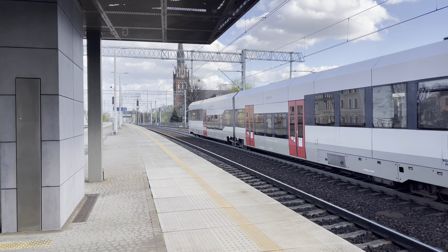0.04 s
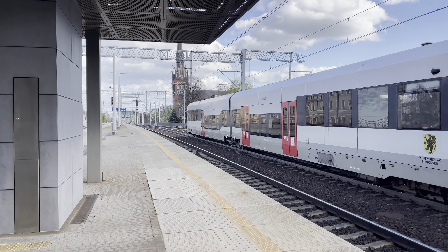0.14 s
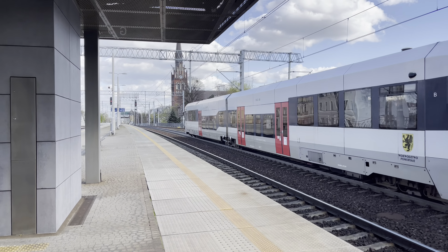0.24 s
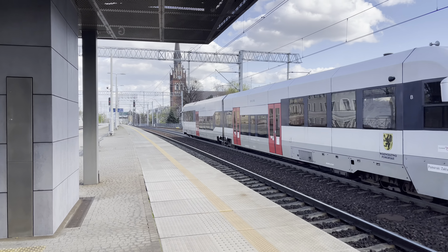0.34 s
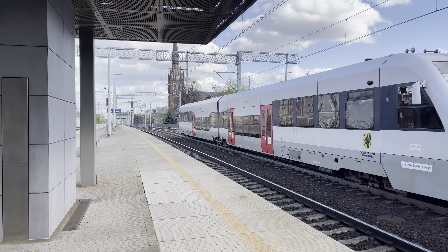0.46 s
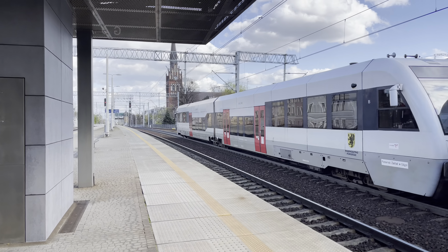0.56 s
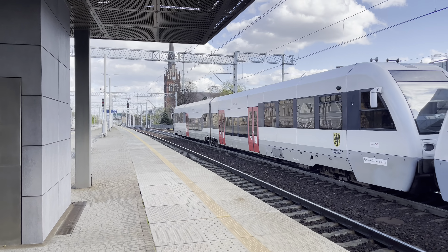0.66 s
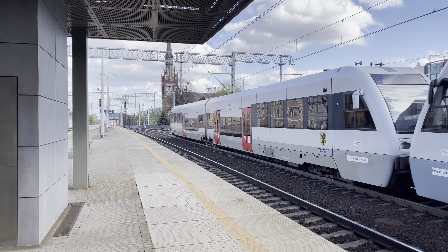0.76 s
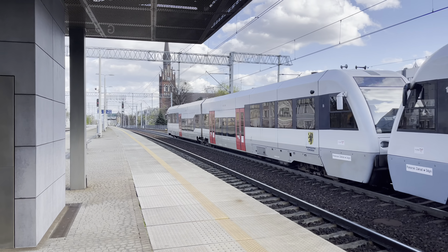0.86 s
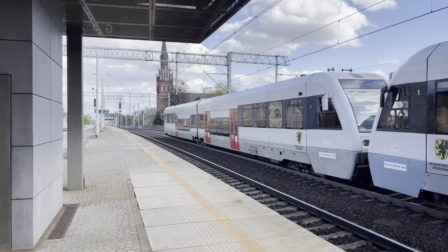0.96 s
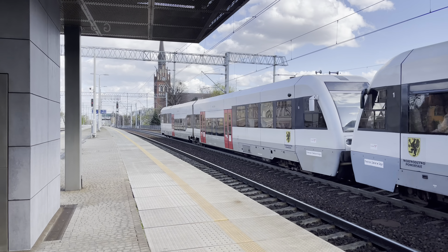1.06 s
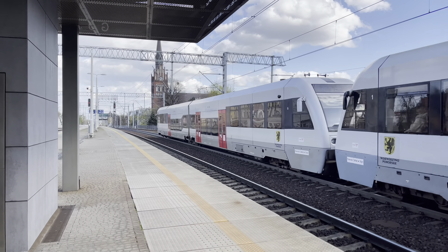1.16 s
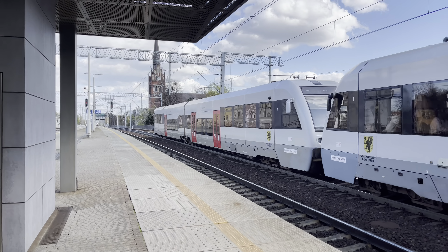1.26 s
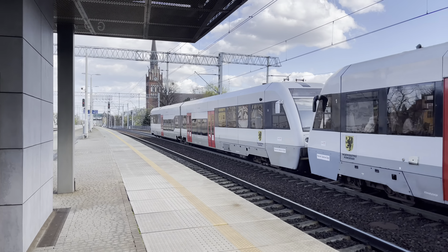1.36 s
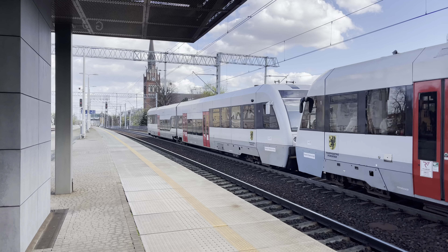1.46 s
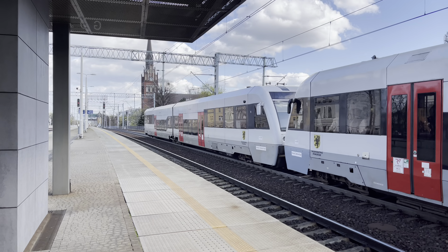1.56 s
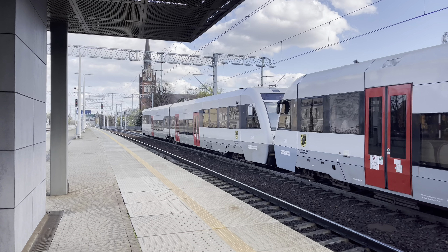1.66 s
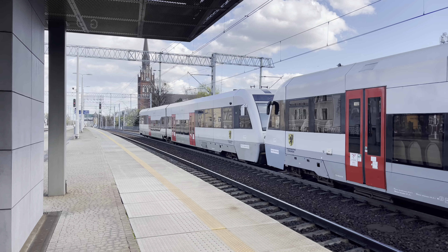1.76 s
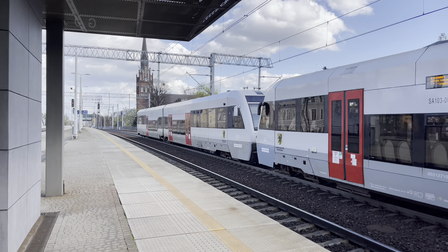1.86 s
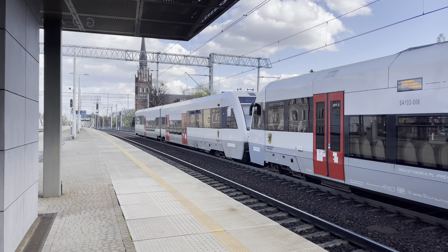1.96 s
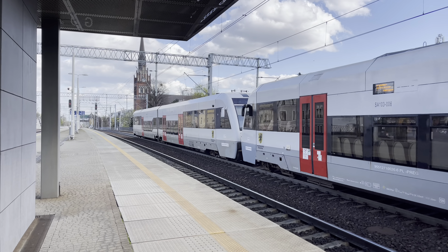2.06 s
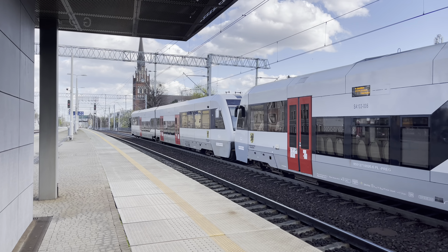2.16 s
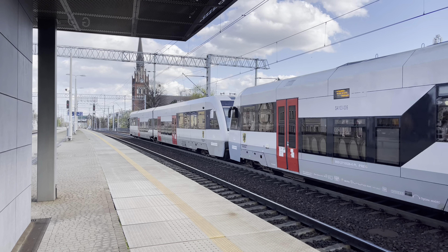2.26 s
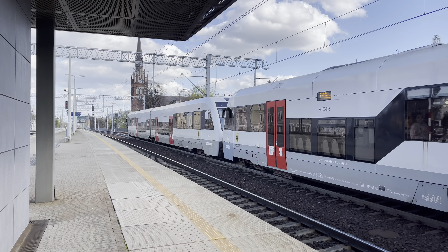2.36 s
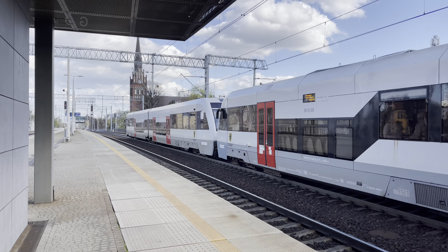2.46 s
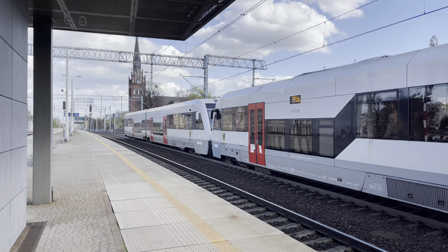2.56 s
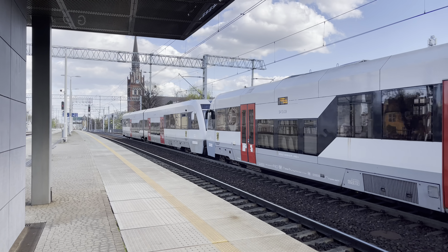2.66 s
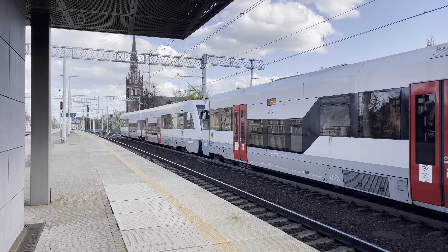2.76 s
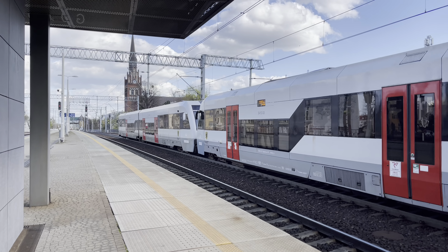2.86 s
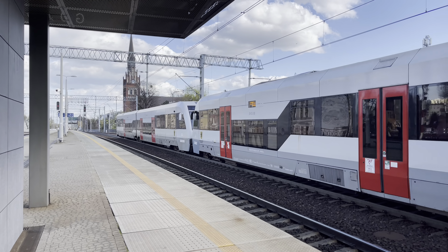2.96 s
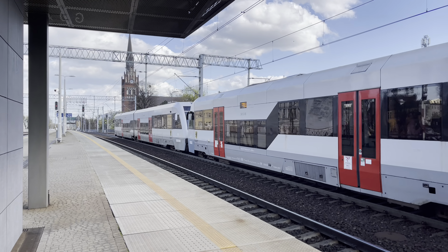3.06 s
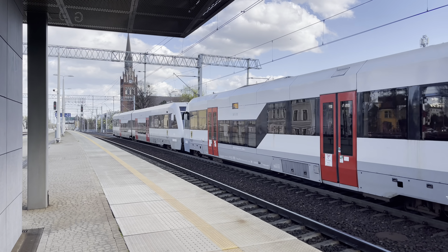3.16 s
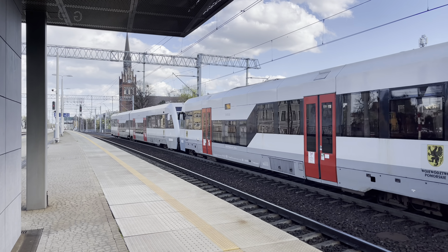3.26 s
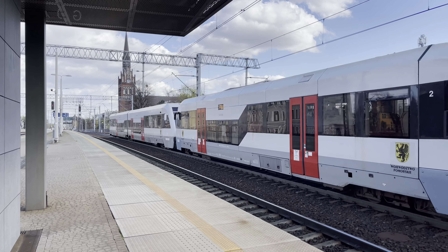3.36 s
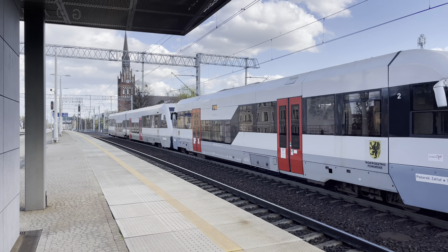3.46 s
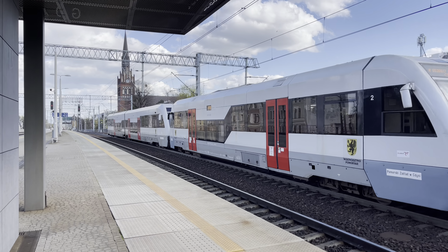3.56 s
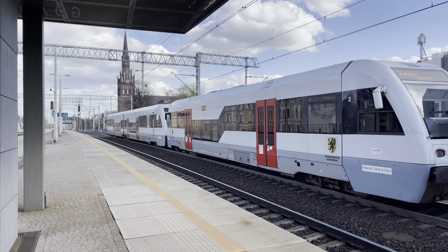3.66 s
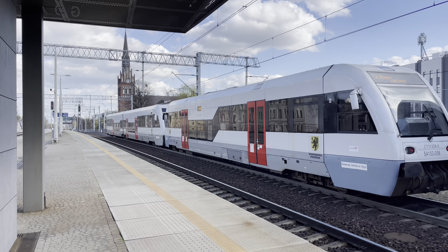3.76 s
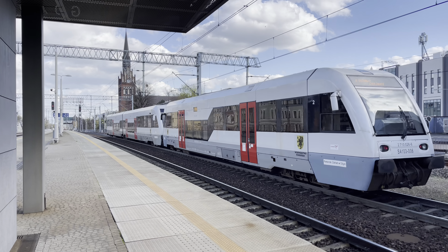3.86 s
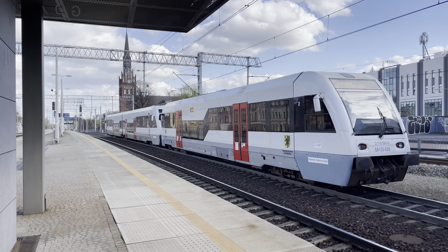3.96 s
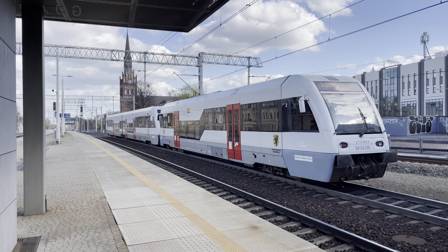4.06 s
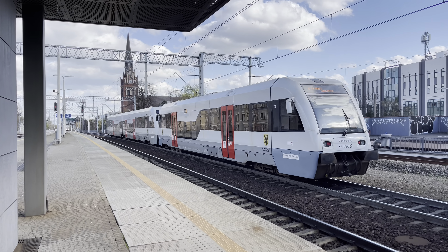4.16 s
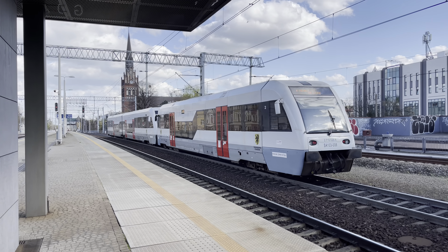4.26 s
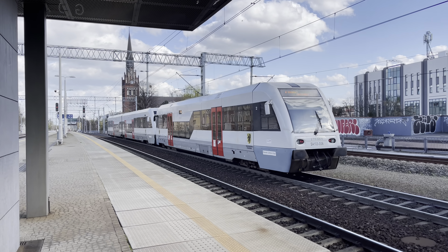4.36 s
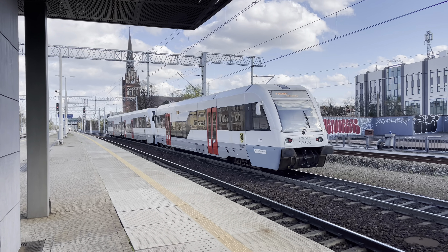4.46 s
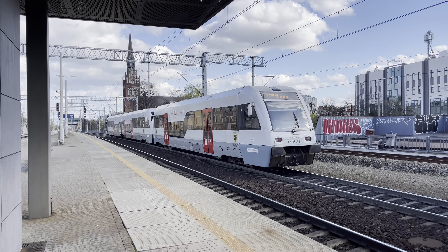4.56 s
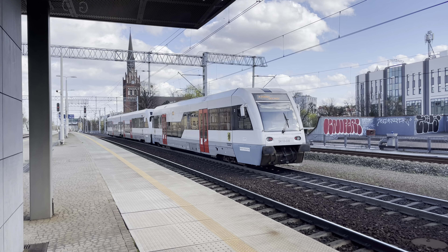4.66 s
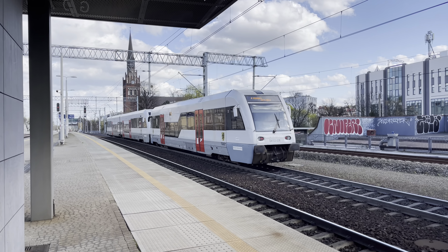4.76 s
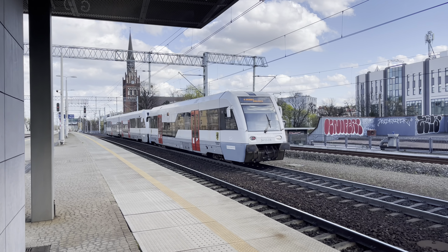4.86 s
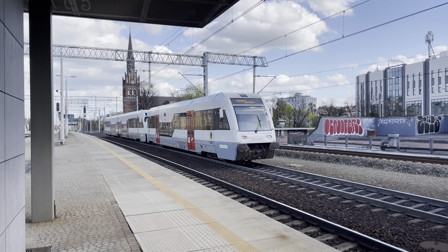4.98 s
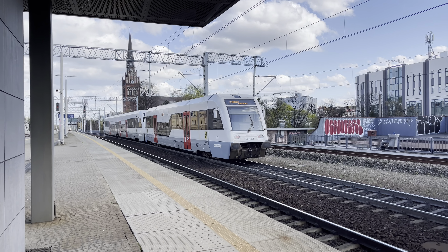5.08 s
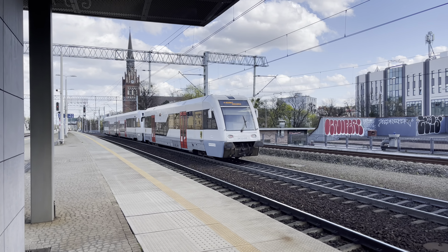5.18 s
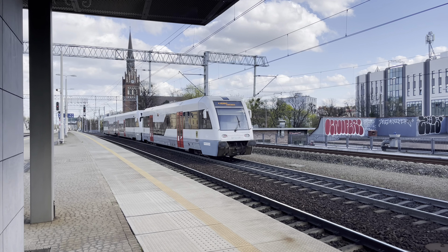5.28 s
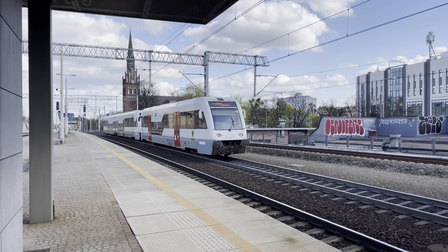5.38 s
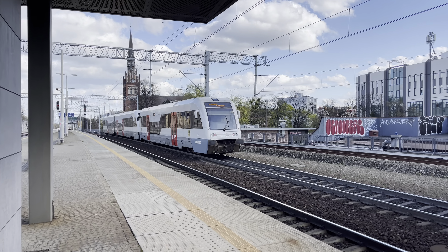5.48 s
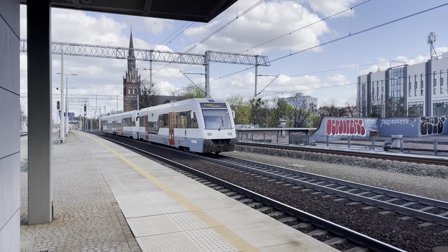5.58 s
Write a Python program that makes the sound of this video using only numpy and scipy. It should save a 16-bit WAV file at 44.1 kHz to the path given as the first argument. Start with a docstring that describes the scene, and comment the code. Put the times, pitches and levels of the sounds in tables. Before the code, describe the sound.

Beside a roofed outdoor platform, a diesel railcar passes close by with a strong low drone, rough rolling roar and faint metallic rings. Clatter and cooling-air hiss swell, dull thuds come from rail joints, then the engine slides down in pitch, climbs again and fades. Handheld phone stereo, fairly full early on, thinning as the train leaves.

```python
"""A diesel railcar pulls away along a roofed platform, heard through the two microphone ports of a phone.
First the exhaust drones in sines on the firing rate, over filtered-noise wheel roar with ringing resonances.
Block clatter and cooling air hiss swell as the power unit goes by, and wheels thud over rail joints.
Then all of it recedes: the firing rate slides down through a gear change and climbs again, and at the end
a platform echo combs the wheel noise with peaks that slide upward."""
import sys
import numpy as np
from scipy import signal
from scipy.fft import rfft, irfft, next_fast_len
from scipy.io import wavfile
from scipy.ndimage import map_coordinates

SR = 44100
rng = np.random.default_rng(int(sys.argv[2]) if len(sys.argv) > 2 else 0)


def digitize_waveform(pressure):
    """Quantize a signal to 16-bit integers and store it at the path in sys.argv[1].

    Rows of a 2-D input are taken as channels; values are limited to [-1, 1].
    """
    field = np.atleast_2d(pressure).T
    bounded = np.clip(field, -1, 1)
    quanta = np.round(bounded * 32767).astype(np.int16)
    wavfile.write(sys.argv[1], SR, quanta)


N = 247842
TIME_S = np.arange(N) / SR
SIZE = next_fast_len(N)
HZ = np.maximum(np.arange(SIZE // 2 + 1) * SR / SIZE, 1)   # frequency of each spectral bin


def from_db(db):
    """Level to gain."""
    return 10 ** (np.asarray(db) / 20)


def rms_one(x):
    """Scaled to rms 1."""
    return x / np.sqrt(np.mean(x ** 2) + 1e-20)


def in_time(rows):
    """The columns of a table after its times, drawn as straight lines, one value a sample."""
    s, *columns = np.transpose(rows)
    return [np.interp(TIME_S, s, column) for column in columns]


def passes(loudest_s, lasting_s):
    """A bell-shaped swell in time, 1 on top."""
    return np.exp(-.5 * ((TIME_S - loudest_s) / lasting_s) ** 2)


def drift(rate_hz):
    """Slow chance of spread about 1: coarse noise through a double one-pole low-pass, run in."""
    step, run_in = 40, 2000   # samples per coarse value, coarse values thrown away
    r = np.exp(-2 * np.pi * rate_hz * step / SR)
    coarse = rng.standard_normal(N // step + 2 + run_in)
    slow = rms_one(signal.lfilter([1], [1, -2 * r, r * r], coarse)[run_in:])
    return np.interp(np.arange(N) / step, np.arange(len(slow)), slow)


def resonate(x, hz, width_hz):
    """A two-pole resonance with gain about 1 on top."""
    r = np.exp(-np.pi * width_hz / SR)
    top = (1 - r * r) / 2
    return signal.lfilter([top, 0, -top], [1, -2 * r * np.cos(2 * np.pi * hz / SR), r * r], x)


def swelling_ring(noise, hz, width_hz, ring_db, loudest_s, lasting_s):
    """One resonance, applied twice, picked out of a noise for a while."""
    out = np.zeros_like(noise)
    start = max(int((loudest_s - 4 * lasting_s) * SR), 0)
    heard = slice(start, int((loudest_s + 4 * lasting_s) * SR))
    once = resonate(noise[:, heard], hz, width_hz)
    ring = rms_one(resonate(once, hz, width_hz))
    out[:, heard] = ring * from_db(ring_db) * passes(loudest_s, lasting_s)[heard]
    return out


def port_noise(colour, flicker_db, rate_hz):
    """Coloured noise of rms 1 before its flicker, twice: direct, and an unrelated share scattered by roof and walls."""
    hz, level_db = np.transpose(colour)
    gain = from_db(np.interp(np.log(HZ), np.log(hz), level_db, -90, -90))
    pair = irfft(gain * rfft(rng.standard_normal((2, SIZE))), SIZE)[:, :N]
    return rms_one(pair) * from_db(flicker_db * drift(rate_hz))


SHIFT_S, SHIFT_SPREAD_S = 3.12, 0.41   # start of the gear change, time scale of its slide


def gear_change():
    """0 in the lower gear; the slide sets in quickly and settles slowly on 1."""
    age = np.maximum(TIME_S - SHIFT_S, 0)
    return 1 - np.exp(-(age / SHIFT_SPREAD_S) ** 1.502)


def firing_rate():
    """The engine climbs, slides down through the gear change and climbs again, in Hz."""
    lower = 91.0 + 1.6 * TIME_S
    higher = 70.5 + 1.8 * (TIME_S - SHIFT_S)
    return lower + gear_change() * (higher - lower)


def deep_noise():
    """The deepest layer, a slowly flickering noise: the train's low end, later wind buffeting the microphones."""
    # level of the deep noise in time: t/s, level/dB
    deep_level = [(0.0, -27), (0.39, -32), (1.17, -32), (1.55, -32), (1.6, -37), (3.11, -46), (5.6, -41),
                  (5.62, -44)]
    # colour of the deep noise: f/Hz, level/dB per Hz
    deep_colour = [(15, -22), (28, -15), (45, -1), (60, 0), (85, -8)]
    level_db, = in_time(deep_level)
    return from_db(level_db) * port_noise(deep_colour, flicker_db=3, rate_hz=1.5)


def rumble(roar_db):
    """Low noise that fades less than the roar and crossfades to another colour as the engine slows."""
    # colour in the lower gear: f/Hz, level/dB per Hz
    early_colour = [(50, -19), (75, -1), (95, -8), (115, 0), (135, -4), (170, -0.5), (230, 0.5), (310, -1),
                    (380, -7.5), (500, -22)]
    # colour once the engine runs slower: f/Hz, level/dB per Hz
    late_colour = [(50, -17), (75, -2), (110, -2), (135, -4), (170, -1), (230, 1.5), (310, -3.5), (380, -7),
                   (500, -15)]
    level_db = -26 + 0.69 * (roar_db + 19)   # -26 dB while the roar is at -19 dB
    changed = gear_change()
    early = np.sqrt(1 - changed) * port_noise(early_colour, flicker_db=0.5, rate_hz=22.0)
    late = np.sqrt(changed) * port_noise(late_colour, flicker_db=1.5, rate_hz=9.3)
    return from_db(level_db) * (early + late)


def panel_drumming(level_db):
    """Panels drum in the low mids: a coloured noise with a faint slow flicker."""
    # colour of the drumming: f/Hz, level/dB per Hz
    panel_colour = [(280, -25), (400, -6.5), (500, -3), (650, -8), (800, -2.5), (1100, -3.5)]
    return from_db(level_db) * port_noise(panel_colour, flicker_db=0.3, rate_hz=2.1)


def air_hiss(level_db):
    """Cooling air hisses: high coloured noise with a fast flicker."""
    # colour of the hiss: f/Hz, level/dB per Hz
    hiss_colour = [(4000, -10), (5800, -10.5), (6700, -10.5), (7100, -10), (8300, -12), (9200, -3),
                   (10600, -1), (11500, -7.5), (12300, -0.5), (12900, -28), (13500, -52)]
    return from_db(level_db) * port_noise(hiss_colour, flicker_db=0.68, rate_hz=42.0)


def block_clatter(level_db, phase):
    """Every other firing knocks harder and pulses the block's noise; passing vents make it ring briefly."""
    # colour of the clatter: f/Hz, level/dB per Hz
    clatter_colour = [(1500, -18), (2500, -6), (3500, -8.5), (4500, -2.5), (6000, -3.5), (6700, -8.5),
                      (7050, -10.5), (8300, -10.5), (9500, -46)]
    # vents going by: f/Hz, width/Hz, level/dB against the clatter, loudest at t/s, lasting/s
    vents = [(6430, 490, -9.5, 0.78, 0.13), (6000, 490, -16, 1.02, 0.045), (5800, 600, -6, 1.55, 0.068),
             (5450, 460, -7, 1.66, 0.07), (6150, 1400, -7, 1.89, .1), (6100, 600, -18, 2.1, 0.055),
             (5960, 600, -12, 3.1, 0.037)]
    knock = 1 + 0.052 * np.sin(phase / 2)
    block = knock * port_noise(clatter_colour, flicker_db=1.0, rate_hz=6.9)
    swells = sum(swelling_ring(block, *vent) for vent in vents)
    return from_db(level_db) * (block + swells)


def thuds():
    """Wheels over rail joints shake the track bed: a short two-mode ring and a quickly dying puff of low noise."""
    # blows on the track bed: t/s, level/dB, f/Hz
    blows = [(1.243, -14, 125), (1.529, -19, 128), (2.439, -23, 112)]
    ring_t60_s, puff_t60_s, rise_s = 0.5, .15, .005
    upper_ratio, upper_db = 1.55, -7   # second mode of the track bed
    out = np.zeros(N)
    low_noise = resonate(rng.standard_normal(N), 220, 260)
    puff_noise = rms_one(resonate(low_noise, 220, 260))
    for start_s, level_db, hz in blows:
        age = np.maximum(TIME_S - start_s, 0)
        turn = 2 * np.pi * hz * age
        modes = np.sin(turn) + from_db(upper_db) * np.sin(upper_ratio * turn)
        ring = modes * from_db(-60 * age / ring_t60_s)
        puff = .7 * puff_noise * from_db(-60 * age / puff_t60_s)
        onset = 1 - np.exp(-age / rise_s)   # also silences the time before the blow
        out += onset * from_db(level_db) * (ring + puff)
    return out


def rails(roar_db):
    """Rough treads shake wheel and rail: a broad roar, rings that swell as bogies go by, brief chance rings."""
    # colour of the roar: f/Hz, level/dB per Hz
    roar_colour = [(500, -14.5), (750, -8.5), (1000, -7.5), (1300, -5), (1600, -8.5), (2200, -10.5),
                   (3000, -13.5), (4500, -20.5)]
    # wheel and rail resonances: f/Hz, width/Hz, level/dB against the roar, loudest at t/s, lasting/s
    resonances = [(1018, 62, -4, 0.074, 0.079), (1034, 160, -6, 0.6, 0.18), (1200, 320, -8.5, 0.15, 0.18),
                  (1230, 410, -10, 0.77, 0.17), (2200, 410, -15, 0.86, 0.23), (1090, 340, -6.5, 1.49, 0.19),
                  (1350, 260, -6, 1.47, 0.15), (1540, 80, -13, 2.12, 0.13), (828, 120, -11, 2.19, .08),
                  (1260, 440, -25, 2.4, 0.11), (870, 150, -11, 2.77, 0.22), (870, 240, -8.5, 3.28, 0.17),
                  (1620, 880, -18, 0.25, 0.61), (890, 120, -8.5, 3.77, 0.11), (886, 43, -10, 4.14, 0.11),
                  (800, 170, -11, 4.62, 0.21), (2500, 380, -18, 2.7, 0.1), (3100, 570, -23, 0.9, 0.16),
                  (2127, 82, -14, 3.32, 0.12), (1310, 150, -15, 3.7, 0.22), (1330, 98, -10, 4.15, 0.088),
                  (1340, 90, -20, 4.7, 0.12), (1720, 98, -15, 4.4, 0.26), (1560, 380, -19, 1.3, 0.23),
                  (3420, 2000, -15.5, 3.6, 1), (1073, 58, -8, 5.0, 0.08), (1350, 90, -24, 5.1, 0.22),
                  (770, 87, -6, 6.5, .08), (2940, 150, -14, 4.23, .08), (497, 21, -8, 4.59, 0.14)]
    chance_count, lowest_hz, highest_hz = 60, 900, 3800
    roar = port_noise(roar_colour, flicker_db=0.5, rate_hz=8.1)
    rings = list(resonances)
    for pitch, size, when in rng.random((chance_count, 3)):
        hz = lowest_hz * (highest_hz / lowest_hz) ** pitch
        ring_db = -21 - 5 * pitch + 4 * size   # higher rings tend to be weaker
        rings.append((hz, .05 * hz, ring_db, when * N / SR, .09))
    out = roar
    for ring in rings:
        out = out + swelling_ring(roar, *ring)
    return from_db(roar_db) * out


def platform_echo(x):
    """Echo off the platform behind the last car: its delay shrinks, so the comb's peaks slide upward."""
    age = np.maximum(TIME_S - 4.1, 0)   # sets in at 4.1 s
    first_peak_hz = 612 + 343 * age
    read = np.arange(N) - SR / first_peak_hz
    share = .3 * np.minimum(age / .4, 1)   # grows for 0.4 s
    late = np.array([map_coordinates(channel, [read], order=3, mode="mirror") for channel in x])
    return (x + share * late) / np.sqrt(1 + share ** 2)


def exhaust():
    """Sines on the firing rate; uneven cylinders add wavering tones on whole and half multiples of the cycle rate."""
    # drone as it reaches the platform: t/s, then rms level/dB of the firing tone and its multiples 2, 3 and 4
    drone_levels = [(0.0, -13, -22.5, -31, -50), (0.16, -14.5, -31.5, -35, -34),
                    (0.35, -10.5, -30.5, -36, -46), (0.5, -11, -33.5, -25.5, -55),
                    (0.68, -13, -27, -33, -41), (0.95, -13, -29, -32.5, -46),
                    (1.14, -13, -30.5, -24.5, -54), (1.3, -15.5, -29.5, -31, -39),
                    (1.45, -15, -31, -47, -34.5), (1.68, -15.5, -28, -36, -55),
                    (1.86, -19.5, -22.5, -47, -43), (2.0, -25, -25.5, -29, -50),
                    (2.12, -28.5, -28.5, -30.5, -46), (2.32, -26, -28, -35, -43),
                    (2.45, -35, -24, -44, -43), (2.57, -26, -29.5, -50, -44),
                    (2.76, -22.5, -35.5, -36.5, -48), (2.92, -25.5, -29.5, -40, -45),
                    (3.1, -27.5, -32.5, -40, -47), (3.22, -29, -31.5, -36.5, -45),
                    (3.33, -29, -29, -33.5, -53), (3.45, -28.5, -35, -40.5, -54),
                    (3.55, -23.5, -36, -34, -60), (3.64, -40, -37, -36, -52), (3.72, -26.5, -40, -40, -52),
                    (3.85, -27, -41.5, -40.5, -51), (4.06, -28.5, -37, -40, -53),
                    (4.34, -27, -34.5, -49, -43), (4.55, -38, -38, -36, -45), (4.68, -33, -44, -39, -40),
                    (4.8, -40, -44, -34, -46), (4.95, -37, -36.5, -42.5, -50), (5.15, -38, -48, -43, -39.5),
                    (5.28, -34, -47, -42, -45.5), (5.42, -32, -53, -43, -39.5), (5.62, -38, -38, -45, -43)]
    # uneven cylinders: whole or half multiple of the six-firing cycle rate, level/dB, loudest at t/s, lasting/s
    uneven_tones = [(4, -50, 5, 0.59), (7, -41, 2.1, 0.75), (7, -31, 2.84, .12), (9, -31.5, 0.12, 0.32),
                    (9, -38, 3.08, 0.14), (11, -38, 2.44, 0.16), (14, -48, 2.06, 0.17),
                    (14, -34, 2.86, 0.29), (16, -40, 0.91, .12), (16, -31.5, 1.6, 0.17),
                    (16, -33.5, 2.34, 0.19), (16, -40.5, 4.25, 0.42), (17, -36.5, 4.14, 0.13),
                    (17, -43, 4.55, 0.14), (20.5, -29.5, 0.24, 0.12), (22, -38, 2.18, 0.18),
                    (22, -39.5, 2.87, 0.1), (27, -44.5, 4.5, 0.32), (27, -39.5, 5, 0.066)]
    pipe_lag_rad, pipe_wander_rad = 1.3, .3
    phase = 2 * np.pi * np.cumsum(firing_rate()) / SR
    drone = np.zeros(N)
    for k, level_db in enumerate(in_time(drone_levels)):
        # higher multiples leave the pipe later, by a wavering amount
        lag = k * k * pipe_lag_rad - k * pipe_wander_rad * drift(1.0)
        drone += np.sqrt(2) * from_db(level_db) * np.sin((k + 1) * phase - lag)
    for multiple, level_db, loudest_s, lasting_s in uneven_tones:
        wavering_db = level_db + 0.81 * drift(3.0)
        gain = np.sqrt(2) * from_db(wavering_db) * passes(loudest_s, lasting_s)
        turn = multiple * phase / 6
        drone += gain * np.sin(turn + .5 * drift(2.1) + rng.uniform(0, 2 * np.pi))
    return drone, phase


def ports(pair):
    """The left port takes the direct sound; the right hears it earlier or later, shaded and part scattered."""
    # the loudest part of the train moves on: t/s, lag of the left port/ms
    bearing = [(0, 0.29), (1.4, 0.31), (2.25, 0.13), (2.75, 0.081), (3.15, -0.074), (4.05, -0.12),
               (5.62, -0.25)]
    # right port against left: f/Hz, lead/turns, likeness 0-1 abeam, from behind, shading/dB abeam, from behind
    port_response = [(20, 0, .92, .92, -.5, -.5), (95, -.05, .99, .99, 1.2, .5),
                     (190, -.1, .82, .85, 2.5, 2), (320, -.1, .78, .82, 2.5, 2), (500, -.1, .4, .4, 8, 7),
                     (750, .16, .87, .6, 5.5, 11), (1200, .03, .7, .35, 3, 6.5), (2300, 0, .42, .6, 3, 2.5),
                     (3500, 0, .35, .35, 3, 8.5), (5900, -.2, .3, .25, 12, 18), (6800, .25, .3, .3, 11, 13),
                     (7100, .6, .4, .55, 5, 10), (8300, 1.03, .45, .97, 6, 1.5),
                     (8900, 1.06, .8, .92, 1, .5), (9800, 1.47, 1, 1, 0, 0), (10350, 1.53, 1, 1, 0, 0),
                     (11500, 1.92, .8, .8, 0, 0), (11800, 2, 1, 1, 0, 0)]
    abeam_ms, behind_ms = .31, -.17
    bearing_top_hz = 5400   # above this the sound comes in round the case by one path, whatever its bearing
    lag_ms, = in_time(bearing)
    behind = np.clip((abeam_ms - lag_ms) / (abeam_ms - behind_ms), 0, 1)
    hz, turns, *sides = np.transpose(port_response)
    direct, scattered = rfft(pair, SIZE)
    low = irfft(direct * (HZ < bearing_top_hz), SIZE)[:N]
    read = np.arange(N) + lag_ms * SR / 1000
    shifted = map_coordinates(low, [read], order=3, mode="mirror")
    lead = np.exp(2j * np.pi * np.interp(HZ, hz, turns))
    direct = rfft(pair[0] - low + shifted, SIZE) * lead
    right = 0
    for share, likeness, shade_db in zip((1 - behind, behind), sides[:2], sides[2:]):
        alike = np.clip(np.interp(HZ, hz, likeness), 0, 1)
        mixed = alike * direct + np.sqrt(1 - alike ** 2) * scattered
        heard = mixed * from_db(-np.interp(HZ, hz, shade_db))
        right = right + share * irfft(heard, SIZE)[:N]
    return np.array([pair[0], right])


def scene():
    """All sources, heard through the two ports."""
    # noise of the train going by: t/s, rail roar/dB, block clatter/dB, air hiss/dB, panel drumming/dB
    passing_levels = [(0.0, -20.5, -28, -28.5, -24.5), (0.41, -19.5, -24.5, -28, -27),
                      (0.89, -20, -24, -28, -22.5), (1.2, -19.5, -26.5, -26, -24),
                      (1.65, -21.5, -28, -22, -23.5), (2.14, -24, -27, -25, -28),
                      (2.6, -24, -31.5, -27, -32), (3.66, -30.5, -36.5, -35, -38),
                      (4.5, -32, -40.5, -39.5, -38), (5.1, -34.5, -43, -46, -42.5),
                      (5.62, -36.5, -43.5, -48, -41)]
    roar_db, clatter_db, hiss_db, panels_db = in_time(passing_levels)
    drone, phase = exhaust()
    background = deep_noise() + rumble(roar_db) + panel_drumming(panels_db)
    power_unit = air_hiss(hiss_db) + block_clatter(clatter_db, phase)
    wheels = platform_echo(rails(roar_db))
    direct_only = (drone + thuds()) * np.array([[1], [0]])   # long waves are hardly scattered
    return ports(background + power_unit + wheels + direct_only)


def record(dry):
    """The highest peaks are rounded off towards 0.9; a steep low-pass cuts the top by 70 dB from 13.4 kHz."""
    rounded = dry / (1 + (dry / .9) ** 8) ** (1 / 8)
    low_pass = signal.cheby2(12, 70, 13400, fs=SR, output="sos")
    return signal.sosfilt(low_pass, rounded)


dry = scene()
out = record(dry)
digitize_waveform(out)
```